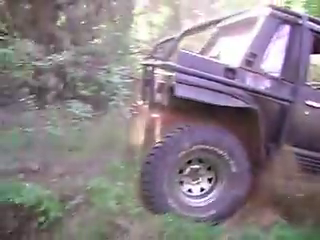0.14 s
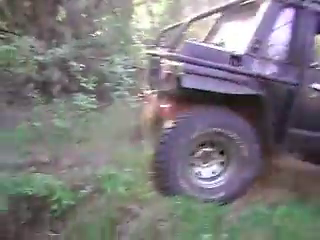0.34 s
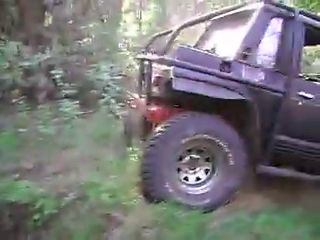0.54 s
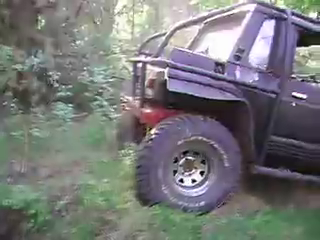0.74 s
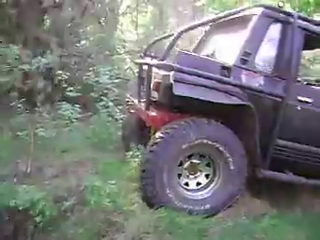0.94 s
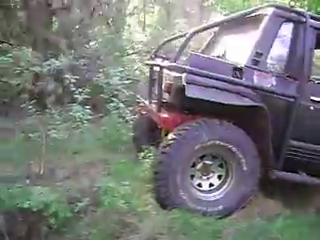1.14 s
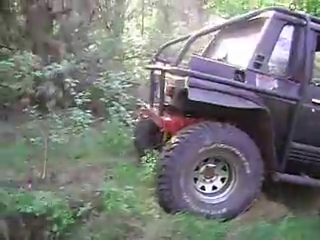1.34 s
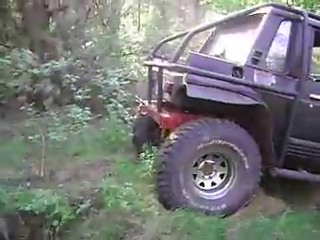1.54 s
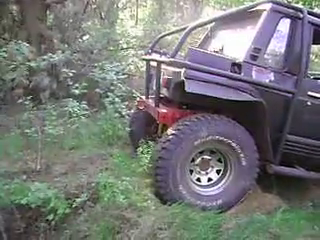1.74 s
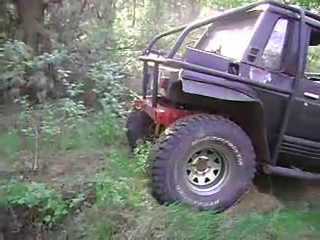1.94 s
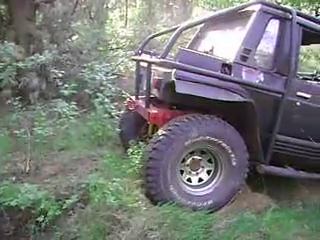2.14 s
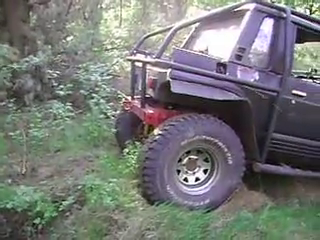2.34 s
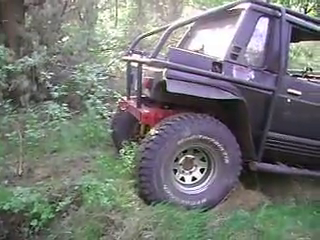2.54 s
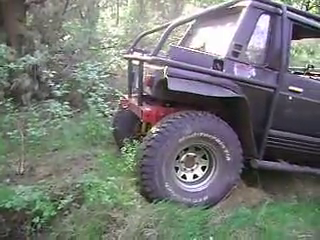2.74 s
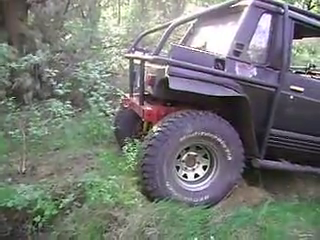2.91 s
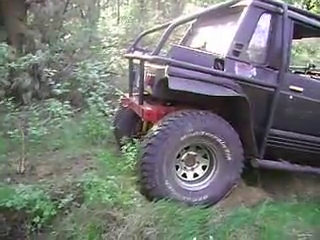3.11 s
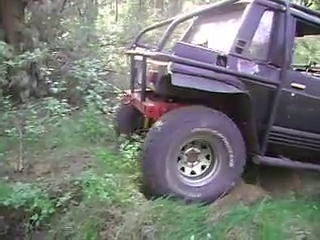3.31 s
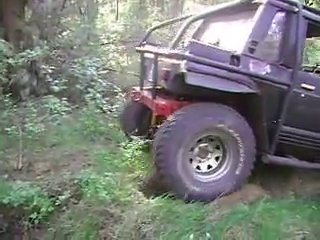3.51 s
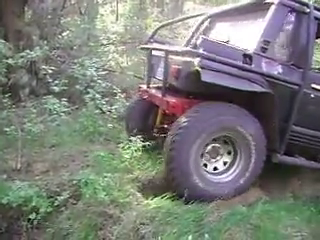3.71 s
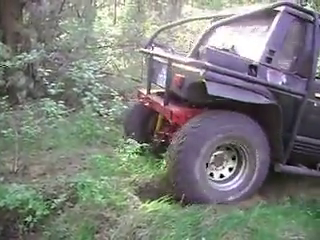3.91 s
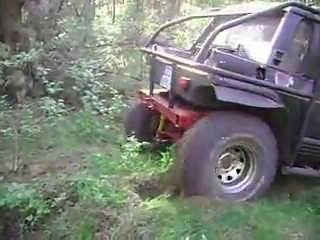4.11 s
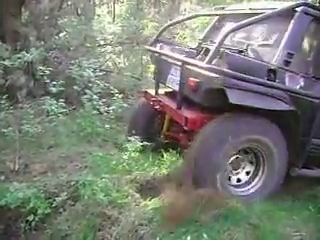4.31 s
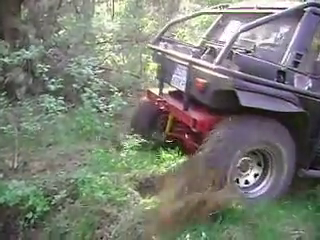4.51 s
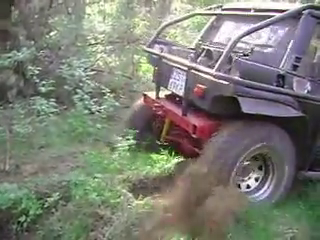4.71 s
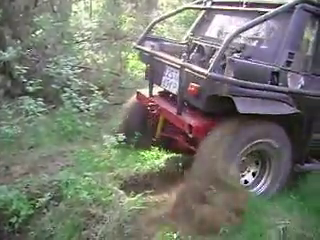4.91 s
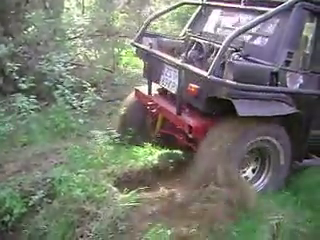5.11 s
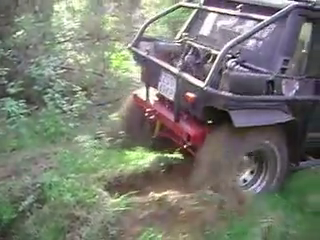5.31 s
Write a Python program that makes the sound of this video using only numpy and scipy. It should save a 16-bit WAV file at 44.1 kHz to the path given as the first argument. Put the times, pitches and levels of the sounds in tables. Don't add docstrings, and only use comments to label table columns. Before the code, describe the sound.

Heavy off-road diesel drops from high revs with mud thumps and twig ticks, idles quietly, then bursts into harsh rattling full-throttle growl.

```python
import sys
import numpy as np
from scipy import signal
from scipy.fft import rfft, irfft, next_fast_len
from scipy.io import wavfile
from scipy.ndimage import uniform_filter1d

SR = 44100
rng = np.random.default_rng(int(sys.argv[2]) if len(sys.argv) > 2 else 0)


def to_linear_factor(level_db):
    exponent = np.asarray(level_db, float) / 20
    return 10 ** exponent


def master(y):
    cut = np.clip(np.atleast_2d(y).T, -1, 1)
    pcm = np.round(cut * 32767)
    wavfile.write(sys.argv[1], SR, pcm.astype(np.int16))


N = 236111

# time in seconds, firing rate in Hz.
FIRING_RATE = [(0.0, 107.36), (0.167, 83.98), (0.346, 70.82), (1.045, 46.23), (1.384, 35.55),
               (1.576, 32.22), (2.455, 31.78), (2.763, 30.82), (2.935, 42.97), (3.176, 73.89),
               (3.341, 82.46), (3.435, 82.93), (3.606, 79.19), (3.855, 79.72), (4.373, 78.4),
               (4.608, 78.52), (4.969, 74.01), (5.354, 71.85)]
# time in seconds, fuel from 0 to 1.
FUEL_SUPPLY = [(0.0, 0.002), (0.06, 0.002), (0.16, 0.002), (0.3, 0.018), (1.0, 0.002), (1.42, 0.002),
               (1.7, 0.002), (2.25, 0.157), (2.36, 0.209), (2.76, 0.175), (2.86, 0.55), (2.96, 1.0),
               (3.14, 0.896), (3.36, 0.563), (3.46, 0.382), (3.6, 0.529), (3.75, 0.644), (5.354, 0.685)]
IDLE_HZ = 32
TURN_START_S, TURN_END_S = 3.7, 4.7

# dB at idle, dB per Hz of firing rate, dB added at full fuel, dB added once turned.
CLATTER_LAW, BONNET_LAW = (-39, 0.1969, 10.5, 2.5), (-52, 0.3424, 15.5, 3.5)
ROAR_LAW, BOOM_LAW = (-38, 0.2239, 3, 0), (-58.5, 0.4436, 18.5, -21)
THUMP_LAW, KNOCK_LAW = (-46, -0.4016, 21.5, 4), (-18.5, 0.0655, 14, 5)
# dB at idle, dB per Hz, dB at full fuel, dB once turned.
ORDER_LAWS = [(-55.5, 0.3265, 30, -2), (-61, 0.54, 18, 0.9), (-44.5, 0.2779, 14.1, 3),
              (-51.5, 0.3389, 16.5, 5.5)]

# frequency in Hz, gain in dB.
SILENCER_GAIN = [(50, -9.0), (82, 0), (100, 1.1), (152, -2.1), (185, -0.2), (218, 3), (255, -2.5),
                 (320, 11)]
# start in seconds, length in seconds, dB.
TAILPIPE_SHUDDERS = [
    (0.79, .27, 12.5),
    (1.13, .27, 10.5),
    (3.362, 0.27, -6.5),
]
PULSE_LAW = .55
ODD_TOP_HZ = 84
PUMPING_DB = -51
CYLINDER_DB = [1.0, -1.0, .5, -1.5, .3, -.5]
# frequency in Hz, width in Hz, level in dB.
TAILPIPE_MODES = [(165, 71, 3.5), (215, 33, 1), (300, 28, -13.5)]

# frequency in Hz, density in dB per Hz.
IDLE_SPECTRUM = [(470, -12), (800, -15), (984, -3.5), (1110, -4.5), (1530, -5.5), (2280, -4), (2750, -5.5),
                 (4100, -13), (5000, -11.5), (5810, -25.5), (7550, -63.5), (12800, -120)]
# frequency in Hz, density in dB per Hz.
LOAD_SPECTRUM = [(500, -15), (800, 7), (1400, -4.5), (2300, -1), (3000, -1.5), (3500, -9), (4300, -10.5),
                 (4900, -4.5), (5800, -21.5), (7500, -62)]
# time in seconds, frequency in Hz, contact in dB.
BONNET_MODE = [(0, 1187, 0.8), (2.85, 1108, -1.2), (3.05, 1142, -10), (3.35, 1188, 0.5), (3.56, 1180, 2),
               (3.68, 1020, 4), (4.2, 1083, -.5), (4.5, 1132, -0.5), (5.354, 1092, -4.5)]
# frequency in Hz, density in dB per Hz.
INJECTOR_SPECTRUM = [(1500, -34), (2600, -11), (3600, 3), (5000, -1), (5800, -5.5), (7500, -54.5)]
# frequency in Hz, density in dB per Hz.
ROAR_SPECTRUM = [(12, -49.5), (20, -24), (60, -14.5), (140, -9), (189, -4), (264, -7.5), (454, -8.5),
                 (507, -10.5), (558, -8), (900, -17.5), (1170, -45), (1980, -120)]

# time in seconds, peak in dB, fall in dB per second.
MUD_SPLATS = [
    (0, -12.5, 118),
    (.14, -17, 122),
    (.28, -17.5, 128.5),
    (.37, -26.5, 36),
]
SPLAT_RISE_DB_PER_S = 245
DIG_S, DIG_DB, DIG_RISE_DB_PER_S, DIG_FALL_DB_PER_S = 5, -50.5, 64, 12
# time in seconds, peak in dB, pitch in Hz, T60 in seconds.
BODY_CLUNKS = [(.003, -13.5, 795, .09), (.128, -15.5, 629, 0.14), (.148, -15, 2520, 0.074),
               (.265, -13, 444, 0.059), (0.293, -11, 1143, 0.071), (.304, -22, 1180, 0.026),
               (0.417, -22, 1043, 0.071), (1.223, -19.5, 1160, 0.021), (1.229, -24, 1590, 0.038),
               (1.275, -27, 1250, 0.054), (1.293, -27.5, 2620, 0.072), (1.31, -21, 1183, 0.054),
               (1.417, -29.5, 2230, .06), (1.628, -26.5, 2130, 0.044), (2.36, -30, 2100, 0.035)]
# time in seconds, peak in dB, pitch in Hz.
EXTRA_KNOCKS = [(.004, -8, 2730), (.022, -8, 2260), (2.9188, -15, 2460), (2.9437, -18, 2590),
                (2.9672, -5.5, 2600), (3.0285, -1.5, 2600), (3.0586, 3.5, 2400), (3.0894, -4, 3060),
                (3.122, -5.5, 2520), (3.1775, -2.5, 2390), (3.2326, 0.5, 2680), (3.357, -8, 2044),
                (3.4507, -10, 3060), (3.5244, -21, 2450), (3.6277, -18, 2720), (3.901, -3.5, 1950),
                (4.2027, -1, 2450), (4.2781, -6.5, 2500), (4.6119, -4.5, 2900), (4.667, -3.5, 2870),
                (4.7021, -8.5, 3080), (4.755, 4, 2370), (4.8174, -2.5, 2920), (4.9801, 6, 2780),
                (5.1442, -13, 2300), (5.1993, -6, 2910)]
LOUD_FIRING, KNOCK_FUEL = 3.97, .3
KNOCK_HZ, KNOCK_HZ_SPREAD, KNOCK_SPREAD_DB = 2490, .11, 0.85
KNOCK_T60_S = 0.043
# time in seconds, peak in dB, pitch in Hz.
TWIG_TICKS = [(0.2924, -8, 2620), (0.328, -6, 3800), (0.3537, -8, 3030), (0.7564, -11.5, 3020),
              (0.9336, -19, 2540), (1.25, -9.5, 3720), (1.3443, -13.5, 2920), (1.3698, -15.5, 3060),
              (1.5487, -9.5, 3300), (1.662, -17, 2690), (1.8413, -24, 2680), (2.022, -19, 2680),
              (2.1002, -22, 3080), (2.2798, -11, 3130), (2.3406, -22, 3080), (2.414, -26, 3040),
              (2.55, -34, 3350), (2.869, -27, 2500)]
TICK_T60_S, CLICK_DB = 0.0021, -7.5
HUM_START_S, HUM_END_S, HUM_RISE_S, HUM_DB = 2.26, 2.88, .08, -39.5
# start in seconds, length in seconds,
# frequency in Hz, level in dB.
PANEL_RATTLES = [(2.86, 0.32, 2470, 5.5), (2.92, 0.082, 1800, 14), (2.987, 0.45, 2950, -2),
                 (3.207, 0.19, 2276, -1), (3.618, 0.33, 2730, 4.5), (3.7, 0.14, 1920, -2),
                 (3.633, .53, 1386, 1.5), (3.898, 0.27, 2236, 2), (4.004, 0.38, 2720, -4.5),
                 (4.18, 0.29, 2440, -0.5), (4.32, .4, 1930, -5.5), (4.58, 0.53, 2855, -3),
                 (4.783, 0.46, 3094, -6.5), (4.878, 0.5, 2466, -7), (4.89, 0.37, 1727, -6)]
RATTLE_EDGE_S = 0.023
BAND_EDGE_HZ, OVERLOAD, CEILING = 5840, 0.72, .705


def evened(x):
    return x / np.sqrt(np.mean(x ** 2) + 1e-20)


def curves(rows):
    s, *columns = np.transpose(rows)
    return [np.interp(np.arange(N) / SR, s, c) for c in columns]


def coloured(x, points):
    f, db = np.transpose(points)
    size = next_fast_len(len(x), True)
    hz = np.fft.rfftfreq(size, 1 / SR)
    gain = to_linear_factor(np.interp(np.log(hz + 1), np.log(f + 1), db))
    return evened(irfft(rfft(x, size) * gain, size)[:len(x)])


def drift(hz):
    return coloured(rng.standard_normal(N), [(0.1, 0), (hz, 0), (4 * hz, -40), (SR / 2, -200)])


def resonate(x, hz, width):
    turn = np.exp(2j * np.pi * np.cumsum(hz * np.ones(len(x))) / SR)
    r = np.exp(-np.pi * width / SR)
    return 2 * (turn * signal.lfilter([1 - r], [1, -r], x / turn)).real


def plateau(t, start, length, edge):
    return np.clip(np.minimum(t - start, start + length - t) / edge, 0, 1)


def level(law, rate_hz, fuel, turned):
    idle_db, db_per_hz, full_db, turned_db = law
    return idle_db + db_per_hz * (rate_hz - IDLE_HZ) + full_db * fuel + turned_db * turned


def exhaust(firings, state):
    t, rate_hz = np.arange(N) / SR, state[0]
    f, gain_db = np.transpose(SILENCER_GAIN)
    first_db, odd_db, second_db, third_db = [
        level(law, *state) + np.interp(np.log(k * rate_hz), np.log(f), gain_db)
        for k, law in zip([1, 1.5, 2, 3], ORDER_LAWS)]
    odd_db = odd_db - ORDER_LAWS[1][1] * np.maximum(rate_hz - ODD_TOP_HZ, 0)
    first_db = np.maximum(first_db, PUMPING_DB)
    fourth_db = third_db + 2.5 - 14.2 * np.clip((rate_hz - 34) / 9, 0, 1)
    third_db = third_db + sum(db * plateau(t, s, length, 0.033) for s, length, db in TAILPIPE_SHUDDERS)
    # order, level in dB, phase lag in radians
    orders = [(1, first_db, 0), (1.5, odd_db, np.pi / 2), (2, second_db, 0), (3, third_db, .8),
              (4, fourth_db, 1.1)]
    phase = 2 * np.pi * firings
    return sum(np.sqrt(2) * to_linear_factor(db + .5 * drift(20)) * np.cos(k * phase - lag) for k, db, lag in orders)


def thumps(firings, thump_db):
    at = np.flatnonzero(np.diff(np.floor(firings)) > 0)
    cylinder_db = np.take(CYLINDER_DB, np.arange(len(at)) % len(CYLINDER_DB))
    puffs = np.zeros(N)
    puffs[at] = to_linear_factor(cylinder_db + 1.2 * rng.standard_normal(len(at)))
    pipe = np.zeros(N)
    for k, (f, width, db) in enumerate(TAILPIPE_MODES):
        mode = evened(resonate(resonate(puffs, f, width), f, 3 * width))
        pipe += (-1) ** k * to_linear_factor(db) * mode
    return to_linear_factor(thump_db) * pipe / np.sqrt(uniform_filter1d(pipe ** 2, 8000))


def combustion(firings):
    strength = to_linear_factor(2.5 * rng.standard_normal(1000))[firings.astype(int)]
    gate = evened(1.84 + strength * np.exp(-((firings + .1) % 1) / 0.12))
    return gate * rng.standard_normal(N) * to_linear_factor(1.78 * drift(25))


def clatter(drive, load, clatter_db):
    idling = coloured(drive, IDLE_SPECTRUM)
    loaded = coloured(drive, LOAD_SPECTRUM) + rattles(drive)
    return to_linear_factor(clatter_db) * (np.sqrt(1 - load) * idling + np.sqrt(load) * to_linear_factor(-1.5) * loaded)


def bonnet(drive, ring_db):
    ring_hz, contact_db = curves(BONNET_MODE)
    hiss = drive + 0.98 * rng.standard_normal(N)
    ring = evened(resonate(resonate(hiss, ring_hz, 100), ring_hz, 280))
    upper = evened(resonate(resonate(hiss, 1.146 * ring_hz, 70), 1.1 * ring_hz, 200))
    return to_linear_factor(ring_db + contact_db) * evened(ring + to_linear_factor(-8.5) * upper)


def injectors(firings, clatter_db):
    count = firings.astype(int)
    strength_db = 2.5 * rng.standard_normal(1000)[count] + 3 * (count % 2)
    snaps = to_linear_factor(strength_db) * np.exp(-(firings % 1) / .25) * rng.standard_normal(N)
    return to_linear_factor(clatter_db - 13.5) * coloured(snaps, INJECTOR_SPECTRUM)


def roar(roar_db):
    return to_linear_factor(roar_db + 1 + 0.58 * drift(11)) * coloured(rng.standard_normal(N), ROAR_SPECTRUM)


def boom(boom_db):
    return to_linear_factor(boom_db) * evened(resonate(resonate(rng.standard_normal(N), 334.5, 60), 380, 130))


def mud():
    t = np.arange(N) / SR
    throws = [(s, db, SPLAT_RISE_DB_PER_S, fall) for s, db, fall in MUD_SPLATS]
    throws += [(DIG_S, DIG_DB, DIG_RISE_DB_PER_S, DIG_FALL_DB_PER_S)]
    mud_db = np.max([db - np.maximum(rise * (s - t), fall * (t - s)) for s, db, rise, fall in throws], axis=0)
    landing = rng.random(N) < 900 / SR
    grains = to_linear_factor(2.4 * rng.exponential(1, N).clip(0, 4)) * landing * rng.standard_normal(N)
    bands = [(342, 160, 14.0), (630, 1200, 5.0), (1300, 430, -23)]  # Hz, width Hz, dB
    splat = sum(to_linear_factor(db) * evened(resonate(grains, f, width)) for f, width, db in bands)
    return to_linear_factor(mud_db) * evened(splat)


def clunks():
    out, t = np.zeros(N + 4000), np.arange(4000) / SR
    for s, db, hz, t60 in BODY_CLUNKS:
        rattle = evened(resonate(rng.standard_normal(4000), hz, 1.3 * hz))
        ring = np.sin(2 * np.pi * hz * t) + .5 * rattle
        out[round(s * SR):][:4000] += to_linear_factor(db - 60 * t / t60) * ring * np.minimum(t / 0.00019, 1)
    return out[:N]


def knock_blows(firings, state):
    at = np.flatnonzero(np.diff(np.floor((firings - LOUD_FIRING) / len(CYLINDER_DB))) > 0)
    at = at[state[1][at] > KNOCK_FUEL]
    at = at[at > SR]
    luck = rng.standard_normal((60, 2)).clip(-2, 2)[:len(at)]
    db = level(KNOCK_LAW, *state)[at] + KNOCK_SPREAD_DB * luck[:, 0]
    hz = KNOCK_HZ * (1 + KNOCK_HZ_SPREAD * luck[:, 1])
    return list(EXTRA_KNOCKS) + list(zip(at / SR, db, hz))


def knocks(blows):
    out, t = np.zeros(N + 8000), np.arange(8000) / SR
    for s, db, hz in blows:
        ping = to_linear_factor(-1.5) * np.sin(2 * np.pi * hz * t) * np.exp(-t / 0.0037)
        ring = to_linear_factor(-0.5) * evened(resonate(rng.standard_normal(8000), hz, 500)) * to_linear_factor(-60 * t / KNOCK_T60_S)
        crack_decay = np.exp(-t / 0.0032) + 0.087 * np.exp(-t / 0.047)
        crack = to_linear_factor(0.5) * coloured(rng.standard_normal(8000), IDLE_SPECTRUM) * crack_decay
        out[round(s * SR):][:8000] += to_linear_factor(db - 8.0) * (ping + ring + crack) * np.minimum(t / 0.0004, 1)
    return out[:N]


def forest(x):
    t = np.arange(12000) / SR
    echoes = rng.random(len(t)) < 2000 / SR
    taps = rng.choice([-1., 1.], len(t)) * echoes * to_linear_factor(-60 * t / 0.9) * (t > .008)
    return signal.fftconvolve(x, taps / np.linalg.norm(taps))[:N]


def ticks():
    out, t = np.zeros(N + 2000), np.arange(2000) / SR
    click = to_linear_factor(CLICK_DB) * np.sin(2 * np.pi * 1300 * t) * np.exp(-t / 0.00028)
    for s, db, hz in TWIG_TICKS:
        ring = np.sin(2 * np.pi * hz * t) * to_linear_factor(-60 * t / TICK_T60_S)
        out[round(s * SR):][:2000] += to_linear_factor(db + 6.5) * (ring + click) * np.minimum(t / 0.00019, 1)
    return out[:N]


def hum():
    t = np.arange(N) / SR
    buzzing = plateau(t, HUM_START_S, HUM_END_S - HUM_START_S, HUM_RISE_S)
    return buzzing * to_linear_factor(HUM_DB + .8 * drift(6)) * np.sin(2 * np.pi * 322 * t)


def rattles(drive):
    out = np.zeros(N)
    for start, length, hz, db in PANEL_RATTLES:
        on = np.arange(round(start * SR), min(round((start + length) * SR), N))
        panel = evened(resonate(resonate(drive[on], hz, 140), hz, 330))
        out[on] += to_linear_factor(db) * plateau(on / SR, start, length, RATTLE_EDGE_S) * panel
    return out


def scene():
    t = np.arange(N) / SR
    rate_hz, fuel = curves(FIRING_RATE)[0], np.clip(curves(FUEL_SUPPLY)[0], 0, 1.2)
    turned = np.clip((t - TURN_START_S) / (TURN_END_S - TURN_START_S), 0, 1)
    state = rate_hz, fuel, turned
    pulsing = rate_hz, fuel ** PULSE_LAW, turned
    firings = .45 + np.cumsum(rate_hz) / SR

    pipe = exhaust(firings, pulsing) + thumps(firings, level(THUMP_LAW, *pulsing))
    clatter_db = level(CLATTER_LAW, *state)
    load = np.clip((clatter_db + 25.5) / 12, 0, 1)
    drive = combustion(firings)
    block = clatter(drive, load, clatter_db) + bonnet(drive, level(BONNET_LAW, *state))
    block += injectors(firings + .1, clatter_db)
    body = roar(level(ROAR_LAW, *state)) + boom(level(BOOM_LAW, *state)) + hum()
    sharp = clunks() + knocks(knock_blows(firings, state)) + ticks()
    return (pipe + block + body + mud() + sharp + to_linear_factor(-8.0) * forest(sharp))[None]


def top_cut(x):
    return signal.sosfilt(signal.butter(12, 15830, fs=SR, output="sos"), x)


def record(dry):
    flattened = np.clip(dry, -OVERLOAD, OVERLOAD)
    low_pass = signal.firwin(255, BAND_EDGE_HZ, window=("kaiser", 10), fs=SR)
    narrow = signal.oaconvolve(flattened, low_pass[None], "same")
    limited = np.clip(narrow, -CEILING, CEILING)
    return top_cut(limited)


dry = scene()
out = record(dry)
master(out)
```